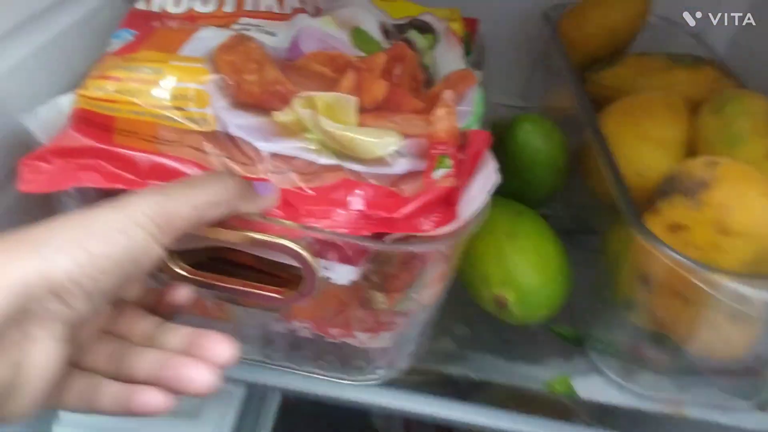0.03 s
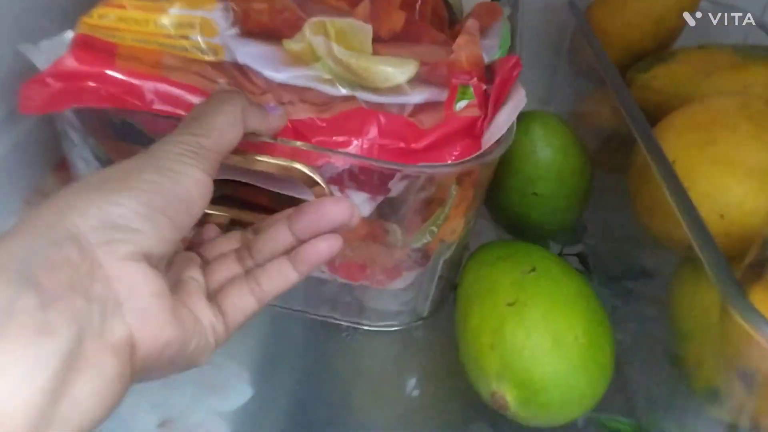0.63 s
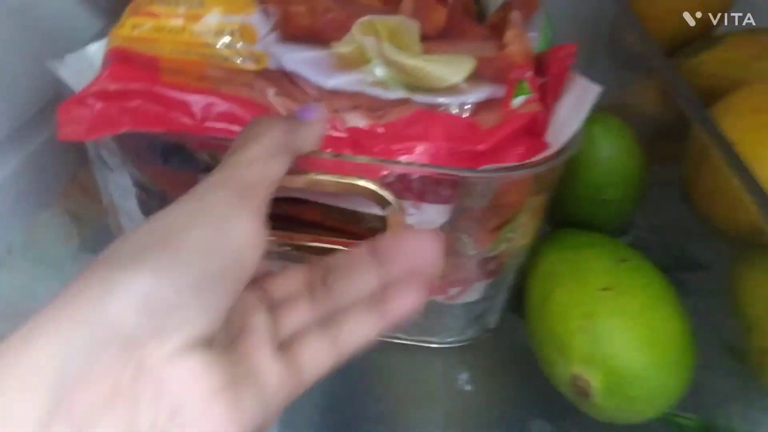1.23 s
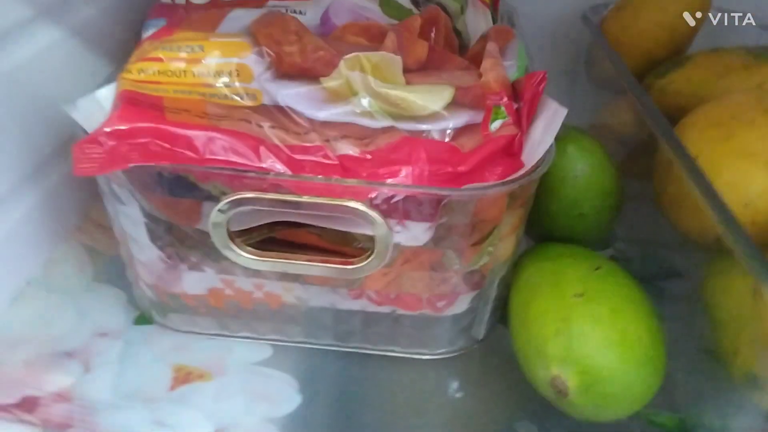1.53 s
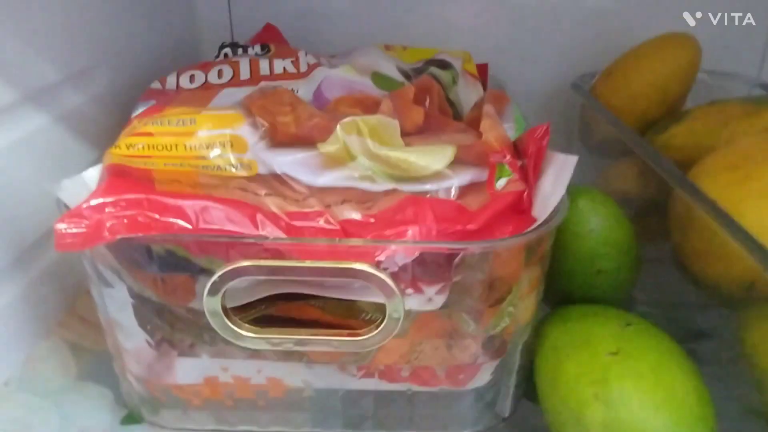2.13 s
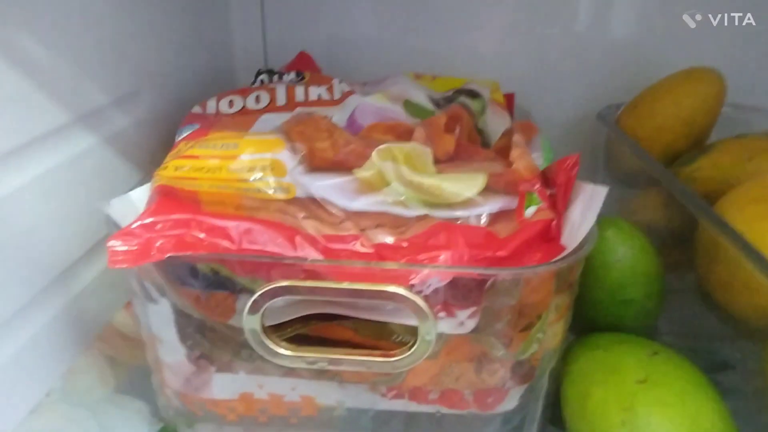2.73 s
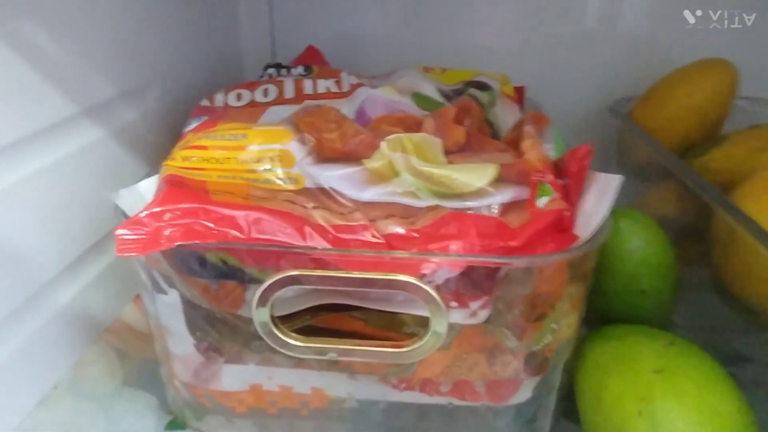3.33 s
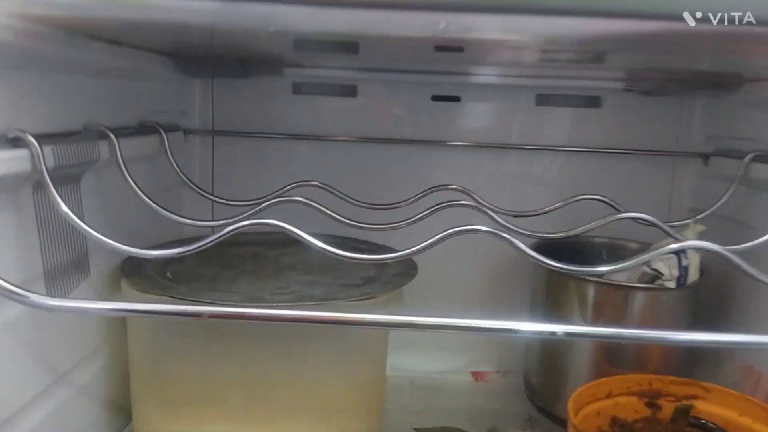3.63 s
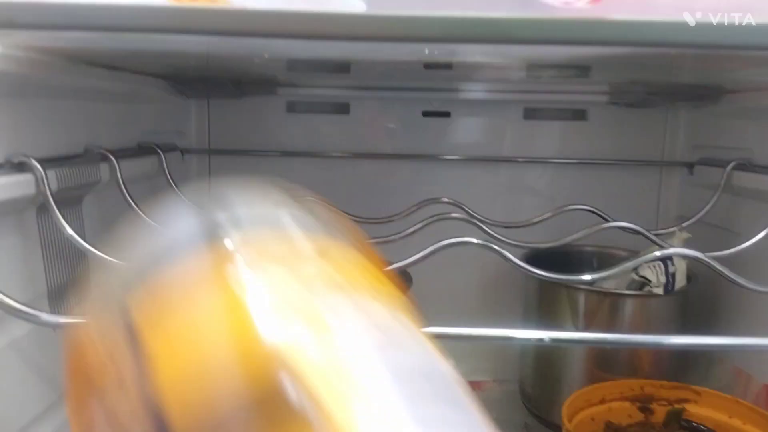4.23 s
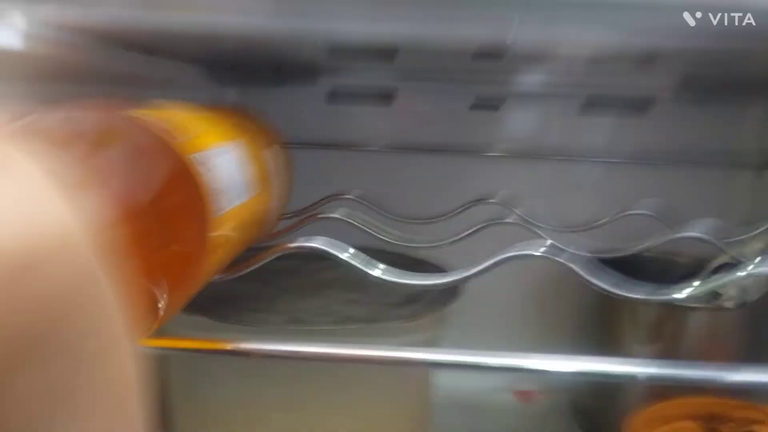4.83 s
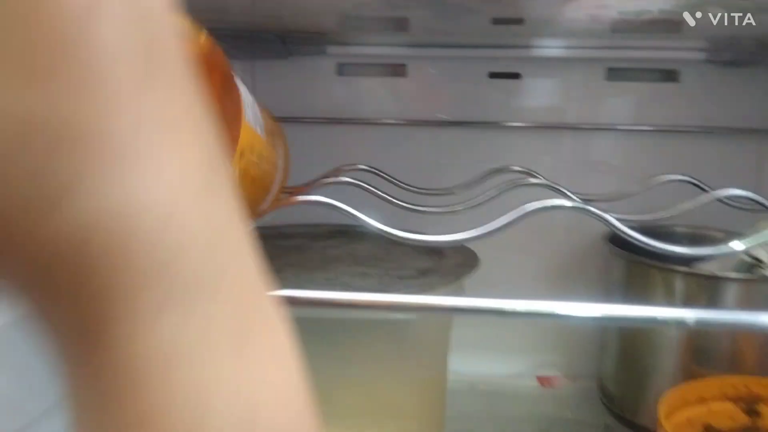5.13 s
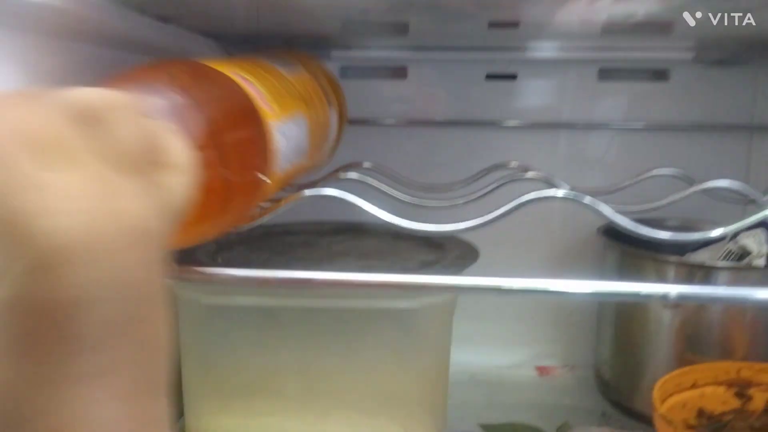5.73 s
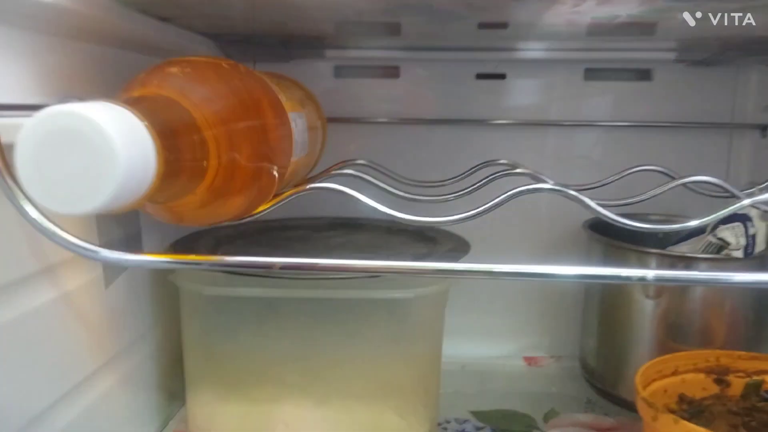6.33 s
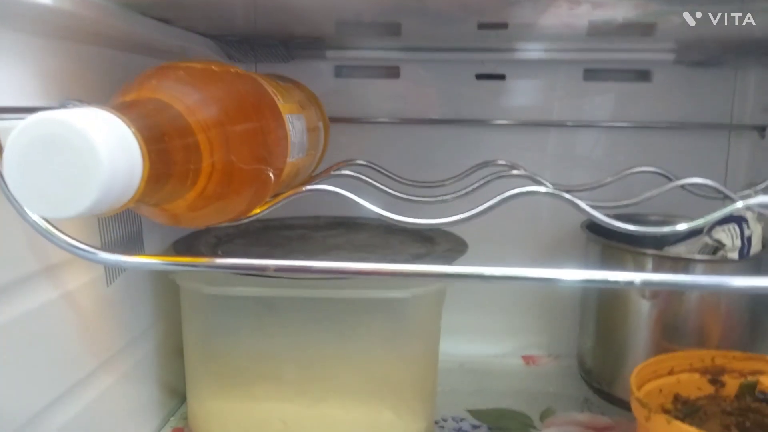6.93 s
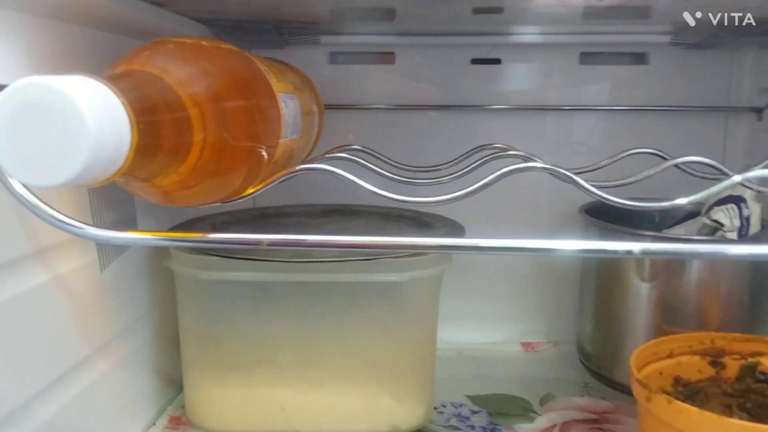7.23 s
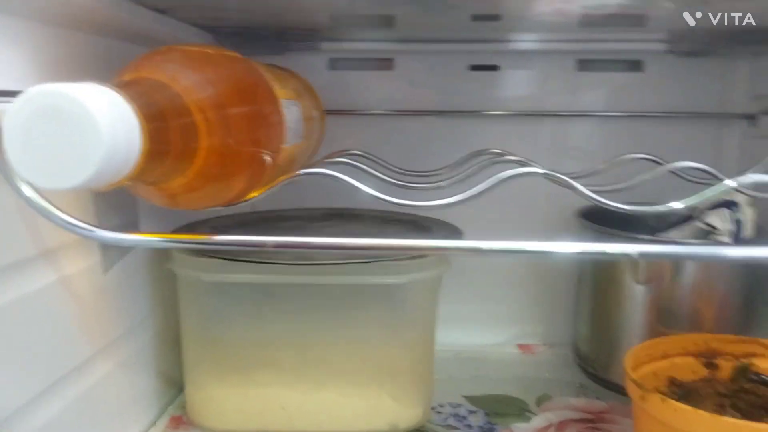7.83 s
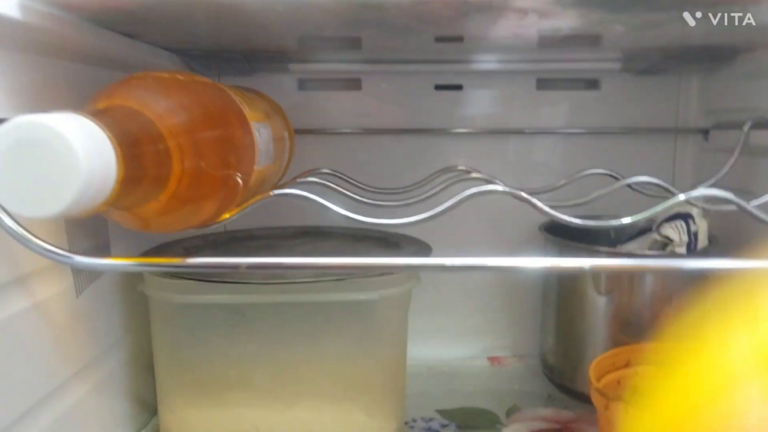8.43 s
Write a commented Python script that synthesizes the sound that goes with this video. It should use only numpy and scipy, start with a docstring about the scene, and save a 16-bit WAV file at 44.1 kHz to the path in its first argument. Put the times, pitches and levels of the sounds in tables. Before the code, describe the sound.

Close up inside an open fridge, a plastic bin scrapes along a glass shelf for the first second and a half. It knocks sharply at about 0.4 seconds, several times just before 1 second, and again at 1.4. A quieter stretch follows, with small ticks, faint hand rustles and soft bumps around 3 seconds. A low hum and faint kitchen hiss run throughout, the hiss turning airier near 3.8 seconds.

At 4.7 seconds a full plastic bottle hits a wire rack and is shoved across it, thumping, crackling and making the wires clatter and ring until about 5.4. Around 6 seconds there is a brief swish and the bottle rocks with lighter rattles, settling with a small tap at 6.5. From about 7 to 8.3 seconds, sharp plastic ticks and soft hand rustling sound close to the right microphone.

```python
"""Inside an open fridge, a plastic bin of packets scrapes and knocks along a glass shelf.
Then a full plastic bottle is pushed onto a wire rack, which clatters and rings,
and the bottle rocks as the hand lets go. Plastic ticks and the hand rustles near the right
microphone, over a low hum and the hiss of the kitchen. Scrapes are made of many tiny slips;
knocks are bursts of noise plus modes, the fading tones that a struck object rings with."""
import sys
import numpy as np
from scipy import signal
from scipy.fft import rfft, irfft, next_fast_len
from scipy.io import wavfile
from scipy.ndimage import uniform_filter1d

SR = 44100
rng = np.random.default_rng(int(sys.argv[2]) if len(sys.argv) > 2 else 0)


def transcribe(u):
    """Save the signal u as a 16-bit wav file named by the first command-line argument.

    u: samples, shape (n,) or (channels, n), limited to [-1, 1]; the rate is SR.
    q: integer samples, one column per channel.
    """
    v = np.clip(np.atleast_2d(u).T, -1, 1)
    q = np.round(v * 32767).astype(np.int16)
    wavfile.write(sys.argv[1], SR, q)


N = 378819

# how alike the two microphones hear each pitch (1 is the same): pitch_hz, likeness
LIKENESS = [(60, 1), (130, 1), (290, 0.97), (640, 0.46), (1400, -0.24), (3100, 0.12), (15000, 0.43)]
# left-right balance of the hand and the background: pitch_hz, left_over_right_db
NEAR_BALANCE = [(100, -2.5), (700, -9), (2400, -8.5), (4400, -11.5), (8200, -26.5), (12000, -10.5),
                (15000, -22)]
# left-right balance of knocks, ticks and skids: pitch_hz, left_over_right_db
CONTACT_BALANCE = [(100, 10), (400, -5.5), (2400, 0.5), (4400, -6), (8200, -19), (12000, -2), (15000, -17)]
# left-right balance of the sliding bin: pitch_hz, left_over_right_db
SLIDE_BALANCE = [(200, -1), (2400, -1), (4400, -11), (8200, -23.5), (15000, -9)]

# tones of the mains hum: pitch_hz, level_db
HUM_TONES = [(60.2, -59), (120.4, -52)]
# the kitchen's hiss (a colour says how strong each pitch is): pitch_hz, gain_db
ROOM_COLOUR = [(60, -3), (90, 10), (180, -0.5), (300, 8.5), (420, -0.5), (1300, -4.5), (4500, -15),
               (6500, -19), (8600, -9), (11000, -20.5), (16000, -21)]
# a faint, hollow rumble around 400 Hz in the first part: pitch_hz, gain_db
RUMBLE_COLOUR = [(150, -5.5), (290, -12), (400, -1), (520, -13.5), (900, -54), (4000, -54)]
# a brighter, airy hiss in the second part: pitch_hz, gain_db
AIR_COLOUR = [(200, 1), (600, 5.5), (1500, 1.5), (3500, 4), (5500, -2.5), (9000, 0.5), (12000, -14)]

# soft bumps of handling: start_s, level_db, pitch_hz
BUMPS = [(2.784, -38, 92.5), (3.001, -41.5, 89), (3.622, -37, 386), (3.629, -39.5, 287)]
# the hand rubs near the microphone: start_s, length_s, level_db
RUBS = [(1.12, 0.059, -41), (1.56, 0.04, -40), (1.78, 0.095, -51.5), (2.97, 0.23, -56), (3.4, 0.051, -48),
        (3.85, 0.65, -55), (3.97, 0.12, -48), (5.72, 0.44, -48), (6.47, 0.16, -48), (6.93, 0.15, -46.5),
        (7.28, 1.14, -52.5), (7.76, 0.041, -38.5)]
# the hand's rustle: pitch_hz, gain_db
RUSTLE_COLOUR = [(2000, -7.5), (4000, -7), (5400, -11), (7200, -1), (8400, 6), (11000, -13), (15500, -9)]
# the bottle's skin skidding on the wires: pitch_hz, gain_db
SKID_COLOUR = [(3000, 6), (5800, 5), (8400, 14), (15000, 9.5)]
# brief swishes of plastic film and skin: loudest_at_s, level_db, fade_s, leftward_db
SWISHES = [(1.599, -60, 0.038, -2), (2.09, -47, 0.0068, -9), (3.029, -53, 0.034, -26),
           (3.174, -44, 0.086, -27), (5.749, -39.5, 0.023, -20), (5.982, -31.5, 0.051, -13)]
# the hiss of a swish: pitch_hz, gain_db
SWISH_COLOUR = [(2500, -5), (6500, 5.5), (8400, 10.5), (10500, 8), (15000, 8), (16000, -9)]
# sharp ticks of plastic close by: start_s, level_db, contact_count
TICKS = [(0.3554, -23.5, 1), (0.3726, -21, 1), (0.516, -28, 1), (0.808, -28, 1), (0.963, -13.5, 2),
         (1.191, -24.5, 2), (1.756, -39.5, 1), (1.93, -32, 1), (4.1213, -33, 1), (5.541, -35, 1),
         (5.665, -41.5, 1), (6.761, -34.5, 1), (6.992, -33, 1), (7.002, -30.5, 1), (7.3689, -21.5, 2),
         (7.385, -25, 2), (7.465, -32.5, 1), (7.6913, -16.5, 2), (7.9527, -21, 1), (8.016, -31, 1),
         (8.0424, -27.5, 1), (8.105, -17, 1), (8.124, -17.5, 2), (8.324, -32, 1)]
# the bright click of a tick: pitch_hz, gain_db
TICK_COLOUR = [(200, -39), (3500, -10.5), (5500, -3), (7200, 2.5), (8400, 12), (10500, -2), (15500, -3)]
# the crackle of the bottle's skin: pitch_hz, gain_db
CRACKLE_COLOUR = [(1500, 0), (3500, 4.5), (5800, 4.5), (8400, 19), (10500, 10.5), (15000, 15), (16000, -13)]

# the hand pushes the bin along the shelf: start_s, length_s, level_db
BIN_PUSHES = [(-0.05, 0.51, -38), (.46, 0.54, -39), (1.19, 0.18, -37.5)]
# plastic scraping on glass: pitch_hz, gain_db
SLIDE_COLOUR = [(180, -4.5), (360, -7), (780, 0.5), (1150, -12), (4000, -9.5), (6200, -11), (8650, 1.5),
                (11200, -12), (16000, -17.5)]
# the bin knocks: start_s, level_db, thump_boost_db, hard_edge_db, contact_count
BIN_KNOCKS = [(0.412, -5, -12, 10, 2), (0.5, -28, 5.5, 8, 1), (0.806, -28, 5, 20, 1),
              (0.817, -16.5, 4.5, 9, 2), (0.896, -16, -3, 8, 1), (0.922, -21.5, -1, 18, 1),
              (0.937, -18.5, 5.5, 25, 2), (0.958, -15, 6, 32, 1), (1.21, -29, 5, 11, 1),
              (1.375, -7, -0.5, 15, 1), (1.385, -8, -11, 14, 1), (1.596, -30, -7, 22, 1)]
# the crack of each knock: pitch_hz, gain_db
CRACK_COLOUR = [(100, -35), (230, -1), (770, 9.5), (1650, -9.5), (2700, -13.5), (4500, -27), (12000, -31)]
# how long the crack lasts (a ring time, or t60, is the time to fade by 60 dB): pitch_hz, ring_s
CRACK_DECAY = [(150, 0.31), (500, 0.096), (12000, 0.027)]
# tones of the bin's hollow walls: pitch_hz, gain_db, ring_s
BIN_MODES = [(403, -21, 0.083), (561, -10, 0.11), (746, 1, 0.052), (820, -2, 0.062), (1030, -22, 0.12),
             (1410, -9.5, 0.049), (1980, -22, 0.057)]
# low tones of the glass shelf: pitch_hz, gain_db, ring_s
SHELF_MODES = [(113, -9.5, 0.23), (175, -8, 0.22), (237, 1.5, 0.099), (314, -4.5, 0.064)]

# the bottle is shoved over the wires: start_s, length_s, coarse_drag_db, fine_skid_db
BOTTLE_SHOVES = [(4.692, 0.16, -19.5, -46), (4.944, 0.23, -21.5, -40), (5.214, 0.0098, -10.5, -37),
                 (5.736, 0.1, -36, -53.5), (5.921, 0.046, -24.5, -39), (6.09, 0.11, -47, -57)]
# the bottle rocks as the hand lets go: start_s, length_s, level_db
BOTTLE_ROCKING = [(5.95, 0.25, -29)]
# the bottle hits the rack: start_s, level_db, clatter_boost_db, crackle_db, contact_count, thump_db
BOTTLE_BLOWS = [(4.702, -4, -18.5, -32, 1, -18.5), (4.732, -19, 2.5, -26, 1, -21),
                (4.756, -12.5, 3, -15, 2, -18), (4.774, -17.5, 0.5, -25, 1, -24),
                (4.822, -5, -12.5, -18, 1, -19), (4.872, -10, -25, -50, 1, -22),
                (4.916, -17, -12, -23.5, 1, -19), (4.996, -29, -13, -17, 1, -24),
                (5.041, -13, 3.5, -15, 2, -50), (5.105, -10.5, -15, -19, 1, -52),
                (5.154, -31, -18, -15.5, 1, -21), (5.214, -5, -16, -28, 2, -29),
                (5.264, -3, -10, -17, 3, -19), (5.357, -13, -8, -44, 1, -27),
                (5.385, -34, -41, -24, 1, -44), (5.732, -45, -1, -24, 1, -50),
                (5.776, -36, -25, -42, 1, -39), (5.957, -23, -27, -15, 1, -24.5),
                (5.988, -16, -29, -14, 1, -44), (6.103, -22.5, -10, -50, 1, -24.5),
                (6.161, -11.5, -22, -31.5, 1, -49), (6.219, -13, -20, -34.5, 2, -45),
                (6.277, -22.5, -17, -40, 1, -28), (6.343, -15.5, -16, -31.5, 2, -44),
                (6.395, -23.5, -19, -50, 1, -42), (6.449, -33, -8, -37.5, 1, -27.5)]
# the rack's tones, which shift once the bottle is seated:
# pitch_hz, gain_db, ring_s, seated_pitch_hz, seated_gain_db
RACK_MODES = [(111.7, -8.5, 1, 120, -10.5), (166, -3, 0.4, 180, -3.5), (188.4, 0, 0.55, 187, -1),
              (221, -2, 0.13, 199, 8), (249, -3, 0.3, 225, 0), (278, -3, 0.46, 277, -7.5),
              (341, 10.5, 0.11, 300, 6.5), (387, -16, 0.23, 350, -1), (445, 2.5, 0.14, 530, 1),
              (489, 1.5, 0.21, 430, 1), (537, 0, 0.22, 535, -11), (659, 2.5, 0.064, 720, -4),
              (892, -0.5, 0.095, 900, -6.5)]
# tones of the bare steel wires: pitch_hz, gain_db, ring_s
WIRE_MODES = [(1396, 1.5, 0.035), (1647, -6, 0.17), (2010, -4.5, 0.2), (2180, -6, 0.28), (2303, 3, 0.13),
              (2353, -3, 0.033), (2530, -12.5, 0.17), (2887, -6, 0.14)]
# the rack's clatter: pitch_hz, gain_db
CLATTER_COLOUR = [(100, 6), (300, 14), (500, 8.5), (850, 6), (1150, 0), (1750, -10), (2300, -1), (3000, -8),
                  (4500, -12), (9000, -11), (16000, -58)]
# how long the clatter lasts: pitch_hz, ring_s
CLATTER_DECAY = [(200, 0.31), (800, 0.15), (2300, 0.14), (9000, 0.059)]
# the last light tap as the bottle comes to rest: pitch_hz, gain_db, ring_s
TAP_MODES = [(720, -6, 0.091), (910, 0, 0.043), (1466, -5, 0.044), (2650, -4, 0.025)]

SHOVE_RISE_S, SHOVE_FADE_S = 0.05, 0.084
SEATED_S = 5.6  # from here on the rack carries the bottle's whole weight


def amp(db):
    """Turns decibels into a gain to multiply by."""
    return 10 ** (np.asarray(db) / 20)


def unit(x):
    """Scales a signal to an average power of 1."""
    return x / np.sqrt(np.mean(x ** 2) + 1e-20)


def read(points, hz):
    """Looks up a pitch in a table, blending between its rows."""
    pitches, values = np.transpose(points)
    return np.interp(np.log(hz + 1), np.log(pitches + 1), values)


def add(mix, s, sound):
    """Mixes a sound in at s seconds."""
    part = mix[:, max(round(s * SR), 0):][:, :sound.shape[1]]
    part += sound[:, :part.shape[1]]


def stereo(white, colour, balance, pan_db=0):
    """Colours two unrelated noises and spreads them over the microphones; positive pan is left."""
    size = white.shape[1]
    padded = next_fast_len(size + 1024)
    shared, separate = rfft(white, padded)
    hz = np.fft.rfftfreq(padded, 1 / SR)
    same = np.clip(read(LIKENESS, hz), -.9, .99)
    left_gain = amp(read(balance, hz) + pan_db)
    pair = np.array([left_gain * shared, same * shared + np.sqrt(1 - same ** 2) * separate])
    pair *= 2 / np.sqrt(1 + left_gain ** 2 + 2 * left_gain * same)  # their average keeps its power
    return irfft(pair * unit(amp(read(colour, hz))), padded)[:, :size]


def hiss(colour, balance, size=N, pan_db=0):
    """Steady coloured noise at both microphones."""
    return stereo(rng.standard_normal((2, size)), colour, balance, pan_db)


def grains(per_s, spread_db, channels=2):
    """Tiny slips at random moments, a few much larger than the rest."""
    size = amp(spread_db * np.minimum(rng.exponential(1, (channels, N)), 4))
    sign = rng.choice([-1, 1], (channels, N))
    happens = rng.random((channels, N)) < per_s / SR
    return unit(size * sign * happens)


def clumps(depth_db, per_s):
    """Friction catches and lets go: a gain that wanders at random."""
    knots = rng.uniform(-1, 1, 2048)
    wander = np.interp(np.arange(N) / SR * per_s, np.arange(len(knots)), knots)
    return unit(amp(depth_db * wander))


def patchy(x, depth_db):
    """Wrinkled film touches now here, now there: each band of pitch swells and sinks on its own."""
    bands = signal.stft(x, nperseg=256)[2]
    swell = uniform_filter1d(rng.standard_normal(bands.shape[1:]), size=9, axis=0)
    swell = uniform_filter1d(swell, size=14, axis=1)
    return unit(signal.istft(bands * amp(depth_db * unit(swell)), nperseg=256)[1][:, :N])


def strokes(rows, rise_s, fade_s):
    """Each movement gathers speed, then dies away once its length is up: a gain per sample."""
    t = np.arange(N) / SR
    power = 0
    for start, length, db in rows:
        rise = np.clip((t - start) / rise_s, 0, 1)
        fade = np.exp(-np.maximum(t - start - length, 0) / fade_s)
        power += (amp(db) * rise * fade) ** 2
    return np.sqrt(power)


def rebounds(s, db, count, gap_s, loss_db):
    """A hard hit bounces: the time and level of each contact, every one weaker than the last."""
    gaps = gap_s * rng.uniform(.7, 1.3, 8)
    return [(s + gaps[:k].sum(), db - k * loss_db) for k in range(round(count))]


def die_away(noise, decay, rise_s=0.00077):
    """A crowd of tones struck at once: each band of the noise fades at its own speed."""
    hz, t, bands = signal.stft(noise, SR, nperseg=256)
    sound = signal.istft(bands * amp(-60 * t / read(decay, hz)[:, None]), SR, nperseg=256)[1]
    return sound * (1 - np.exp(-np.arange(sound.shape[1]) / SR / rise_s))


def thud(hz, t60, rise_s, size=8192):
    """A dull, soft-edged low push, alike at both microphones."""
    t = np.arange(size) / SR
    shape = amp(-60 * t / t60) * (1 - np.exp(-t / rise_s))
    return shape * np.sin(2 * np.pi * hz * t)[None] * np.sqrt(2)


def ring(modes, scatter_db, detune=0, rise_s=0.0013, size=32768):
    """One blow rings an object; where it lands changes each tone's share and the high ones' phase."""
    hz, db, t60 = np.transpose(modes)[:, :, None]
    hz = hz * (1 + detune * rng.uniform(-1.12, 1, hz.shape))  # the load shifts between blows
    t = np.arange(size) / SR
    share = amp(db + scatter_db * rng.standard_normal(hz.shape))
    phase = np.exp(1j * hz / 700 * rng.standard_normal(hz.shape))
    index = np.arange(len(hz))[:, None]
    struck = (-1) ** (index // 2) * share * phase
    # short waves reach the two microphones out of step
    apart = np.exp(.5j * np.arccos(np.clip(read(LIKENESS, hz), -1, 1)) * (-1) ** index)
    weights = np.hstack([struck * apart, struck / apart]).T / np.linalg.norm(share)
    waves = np.exp(((2j * np.pi * hz - np.log(1000) / t60) * t).astype(np.complex64))
    return (weights @ waves).imag * (1 - np.exp(-t / rise_s))


def chatter(slips, modes):
    """A run of small slips keeps an object ringing."""
    body = ring(modes, scatter_db=1.5)
    return signal.oaconvolve(slips, body / np.linalg.norm(body[0]), axes=1)[:, :N]


def fridge_echoes(x, wet_db, t60, size=8192):
    """The fridge's hard walls add a quick, dense cluster of echoes to a sound."""
    t = np.arange(size) / SR
    taps = rng.standard_normal((2, size)) * amp(-60 * t / t60) * (t > .002)
    echoes = signal.oaconvolve(x, taps / np.linalg.norm(taps, axis=1, keepdims=True), axes=1)[:, :N]
    return (x + amp(wet_db) * echoes) / np.hypot(1, amp(wet_db))


def kitchen(change_at_s=3.76, change_length_s=0.13):
    """Mains hum and room hiss; a low rumble quickly gives way to a brighter, airy hiss."""
    t = np.arange(N) / SR
    hum = sum(np.sqrt(2) * amp(db) * np.sin(2 * np.pi * (hz * t + rng.random())) for hz, db in HUM_TONES)
    room = amp(-54.5) * hiss(ROOM_COLOUR, NEAR_BALANCE, pan_db=4)
    rumble = amp(-57.5) * hiss(RUMBLE_COLOUR, NEAR_BALANCE)
    air = amp(-57) * hiss(AIR_COLOUR, NEAR_BALANCE, pan_db=-4)
    blend = np.clip((t - change_at_s) / change_length_s, 0, 1)
    return hum * amp([[-1.2], [1.2]]) + room + (1 - blend) * rumble + blend * air


def bumps():
    """Handling makes a few soft, low thuds."""
    out = np.zeros((2, N))
    for s, db, hz in BUMPS:
        add(out, s, amp(db) * thud(hz, t60=0.1, rise_s=0.002))
    return out


def skidding():
    """How hard the bottle's skin slides on the wires, as a gain per sample."""
    return strokes([(s, length, db) for s, length, _, db in BOTTLE_SHOVES], SHOVE_RISE_S, SHOVE_FADE_S)


def rubbing(hand_db=-2, skid_db=2):
    """Fine friction from the hand near the microphone and the bottle skidding over the wires."""
    catch = clumps(depth_db=3.5, per_s=35)
    hand = stereo(grains(per_s=6000, spread_db=4.5) * catch, RUSTLE_COLOUR, NEAR_BALANCE)
    skid = stereo(grains(per_s=1200, spread_db=2.5) * catch, SKID_COLOUR, CONTACT_BALANCE)
    rubs = strokes(RUBS, rise_s=0.066, fade_s=0.025)
    return amp(hand_db) * rubs * hand + amp(skid_db) * skidding() * skid


def swishes(rise_s=0.017, pan_db=8):
    """Plastic film and skin brush past in quick strokes that swell and fade."""
    out = np.zeros((2, N))
    t = np.arange(16384) / SR - .06  # zero is the loudest moment
    for s, db, fade_s, side_db in SWISHES:
        shape = np.exp(np.minimum(t / rise_s, -t / fade_s))
        slips = grains(per_s=4800, spread_db=3.5)[:, :len(t)]
        friction = stereo(slips, SWISH_COLOUR, CONTACT_BALANCE, side_db + pan_db)
        add(out, s + t[0], amp(db) * shape * friction)
    return out


def snap(colour, fade_s, pan_db, rise_s, size=4096):
    """Stiff plastic lets go at once: a bright burst that dies in milliseconds."""
    t = np.arange(size) / SR
    return np.minimum(t / rise_s, 1) * np.exp(-t / fade_s) * hiss(colour, CONTACT_BALANCE, size, pan_db)


def snapping(tick_db=4.5, crackle_db=-5):
    """Plastic ticks close by, and the bottle's skin crackles with every blow."""
    out = np.zeros((2, N))
    for start, level_db, count in TICKS:
        for s, db in rebounds(start, level_db, count, gap_s=0.0051, loss_db=1.5):
            add(out, s, amp(db + tick_db) * snap(TICK_COLOUR, fade_s=0.0013, pan_db=-4, rise_s=0.0003))
    for s, _, _, db, _, _ in BOTTLE_BLOWS:
        add(out, s, amp(db + crackle_db) * snap(CRACKLE_COLOUR, fade_s=0.0055, pan_db=0.5, rise_s=0.001))
    return out


def plastic_bin(walls_db=-6, crack_db=-11.5, thump_db=-7):
    """The bin grinds over the glass; each knock cracks, rings its walls and thumps the shelf."""
    grit = patchy(grains(per_s=9000, spread_db=2.8), depth_db=2.3) * clumps(depth_db=3.2, per_s=45)
    push = strokes(BIN_PUSHES, rise_s=0.085, fade_s=0.029)  # starts slowly, stops short
    scrape = push * stereo(grit, SLIDE_COLOUR, SLIDE_BALANCE)
    out = fridge_echoes(scrape, wet_db=-9, t60=.06)
    for start, level_db, low_db, edge_db, count in BIN_KNOCKS:
        for s, db in rebounds(start, level_db, count, gap_s=.007, loss_db=4):
            crack = hiss(hardened(CRACK_COLOUR, edge_db), CONTACT_BALANCE, size=8192)
            walls = ring(hardened(BIN_MODES, edge_db), scatter_db=2, detune=.03, size=8192)
            shelf = ring(SHELF_MODES, scatter_db=2, size=16384)
            add(out, s, amp(db + crack_db) * die_away(crack, CRACK_DECAY))
            add(out, s, amp(db + walls_db) * walls)
            add(out, s, amp(db + low_db + thump_db) * shelf)
    return out


def hardened(rows, edge_db):
    """A harder contact sounds brighter: lifts a table's gains above 800 Hz."""
    return [(hz, db + edge_db * np.clip(np.log10(hz / 800), 0, .65), *rest) for hz, db, *rest in rows]


def rack_modes(seated):
    """The rack's tones before or after it takes the bottle's whole weight."""
    return [(seated_hz, seated_db, t60) if seated else (hz, db, t60)
            for hz, db, t60, seated_hz, seated_db in RACK_MODES]


def bottle_drag(drag_db=-7, grind_db=-14, sing_db=-8):
    """Coarse slips shake the rack and grind it on its supports; fine ones make the wires sing."""
    shoves = strokes([row[:3] for row in BOTTLE_SHOVES], SHOVE_RISE_S, SHOVE_FADE_S)
    rocking = strokes(BOTTLE_ROCKING, rise_s=0.029, fade_s=0.2)
    drag = np.hypot(shoves, rocking)
    slips = grains(per_s=150, spread_db=3.5, channels=1) * drag
    seated = np.arange(N) / SR > SEATED_S
    shake = chatter(slips * ~seated, rack_modes(seated=False))
    shake += chatter(slips * seated, rack_modes(seated=True))
    grind = drag * stereo(grains(per_s=700, spread_db=2), CLATTER_COLOUR, CONTACT_BALANCE)
    sing = chatter(grains(per_s=450, spread_db=-15, channels=1) * skidding(), WIRE_MODES)
    return amp(drag_db) * shake + amp(grind_db) * grind + amp(sing_db) * sing


def bottle_blows(ring_db=-5.5, clatter_db=-5, wire_db=-14, damping_s=0.072, tap_s=6.5015, tap_db=-24):
    """Each blow thumps the rack on its supports, rings it and rattles it; a light tap comes last."""
    out = np.zeros((2, N))
    first_blow_s = BOTTLE_BLOWS[0][0]
    for start, level_db, bright_db, _, count, thump_db in BOTTLE_BLOWS:
        add(out, start, amp(thump_db) * thud(hz=108, t60=0.19, rise_s=0.0088))
        # the wires ring louder at first, until the bottle's weight damps them
        free_db = 6 * np.exp((first_blow_s - start) / damping_s)
        detune = .06 if start > SEATED_S else .035  # rocking shifts the load more than sliding
        for s, db in rebounds(start, level_db, count, gap_s=.0125, loss_db=3.5):
            bounce_db = -3 if s > start else 0  # a bounce rattles more than it rings
            frame = ring(rack_modes(s > SEATED_S), scatter_db=2.2, detune=detune, rise_s=.002)
            wires = ring(WIRE_MODES, scatter_db=2, detune=.008, size=16384)
            noise = hiss(CLATTER_COLOUR, CONTACT_BALANCE, size=8192)
            clatter = die_away(noise, CLATTER_DECAY, rise_s=0.00065)
            add(out, s, amp(db + ring_db + bounce_db) * frame)
            add(out, s, amp(db + bright_db + wire_db + free_db) * wires)
            add(out, s, amp(db + bright_db + clatter_db) * clatter)
    add(out, tap_s, amp(tap_db) * ring(TAP_MODES, scatter_db=1.5))
    return out


def wire_rack(lowest_hz=80):
    """The bottle hits and drags over the rack; its sound carries no deep bass."""
    bass_cut = signal.butter(2, lowest_hz, "high", fs=SR, output="sos")
    return signal.sosfilt(bass_cut, bottle_blows() + bottle_drag())


def scene():
    """All the sources at the two microphones."""
    small_sounds = fridge_echoes(snapping() + swishes() + rubbing(), wet_db=-3, t60=0.078)
    return plastic_bin() + bumps() + wire_rack() + small_sounds + kitchen()


def record(dry, low_cut_hz=48, high_cut_hz=15700):
    """The recorder cuts the deepest bass and the highest treble."""
    thinned = signal.sosfilt(signal.butter(2, low_cut_hz, "high", fs=SR, output="sos"), dry)
    treble_cut = signal.firwin(301, high_cut_hz, window=("kaiser", 8), fs=SR)
    return signal.oaconvolve(thinned, treble_cut[None], "same")


dry = scene()
out = record(dry)
transcribe(out)
```